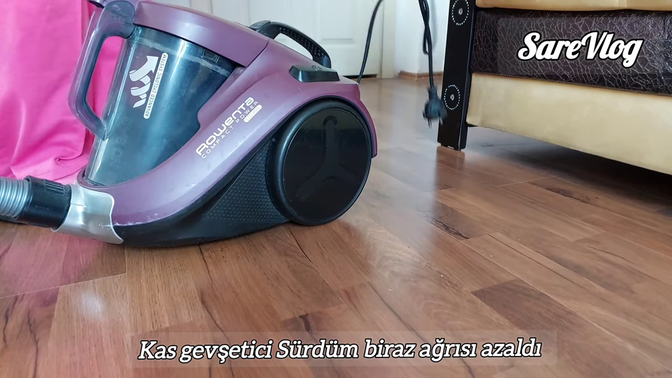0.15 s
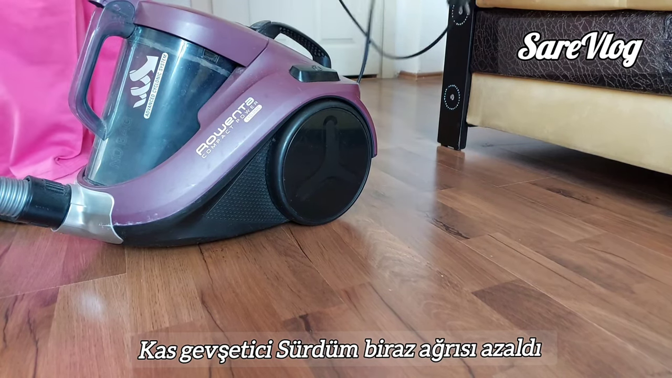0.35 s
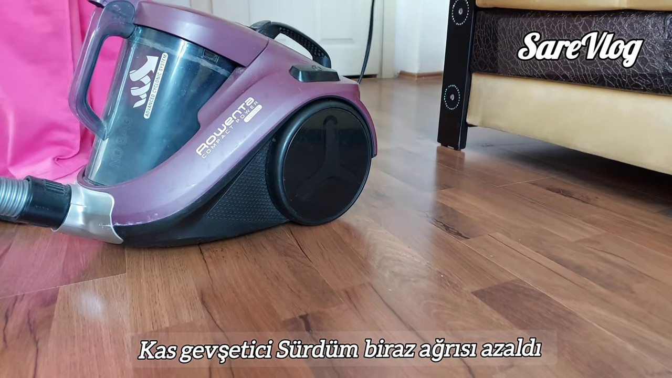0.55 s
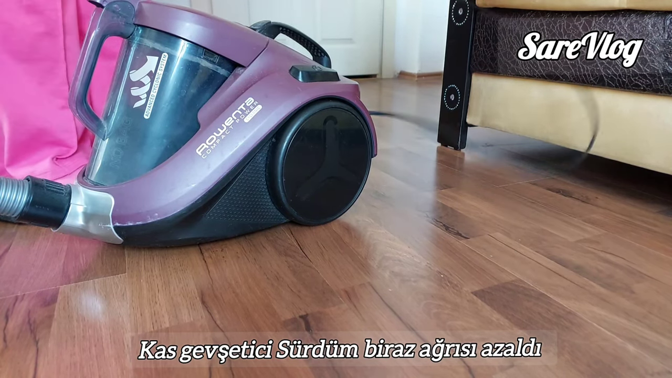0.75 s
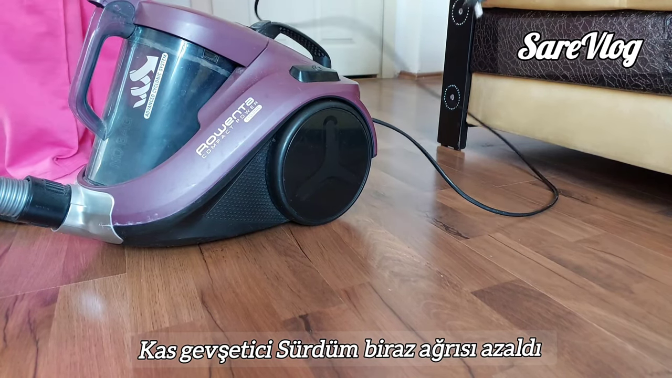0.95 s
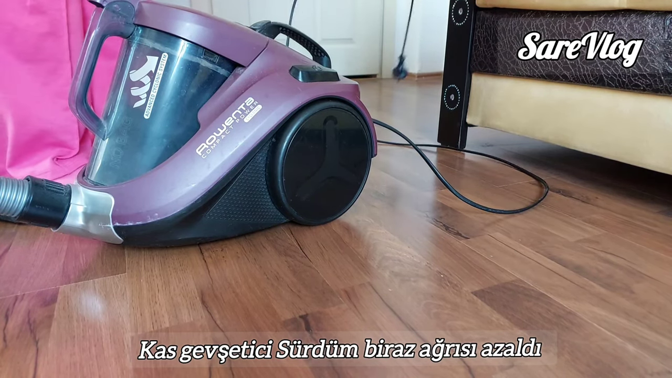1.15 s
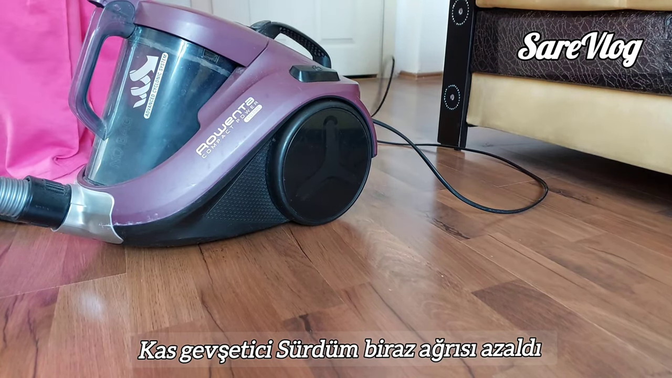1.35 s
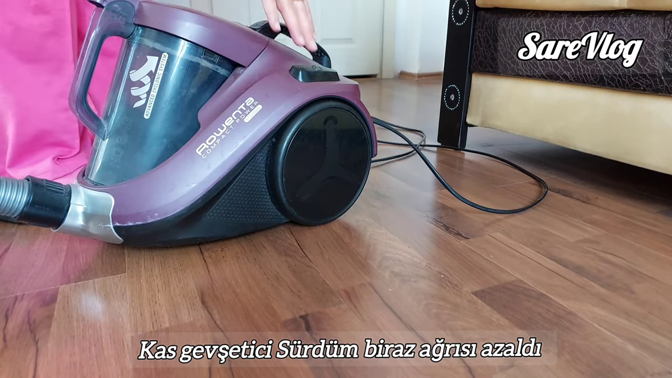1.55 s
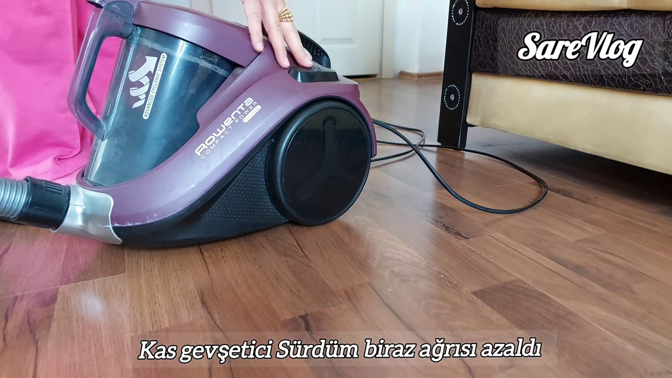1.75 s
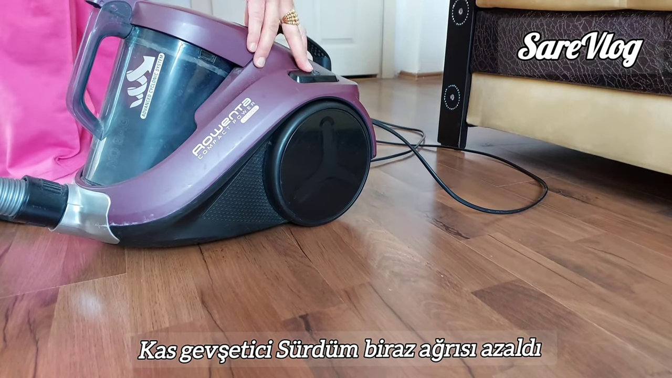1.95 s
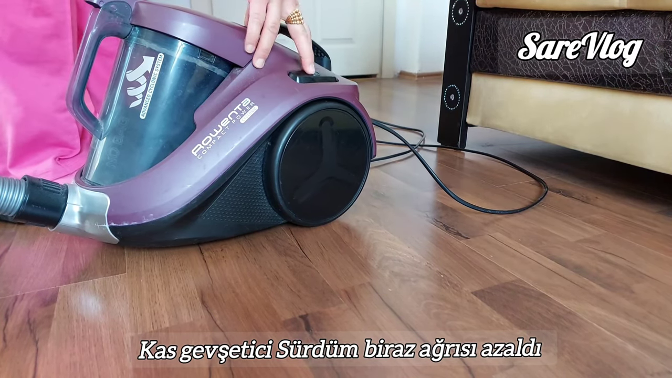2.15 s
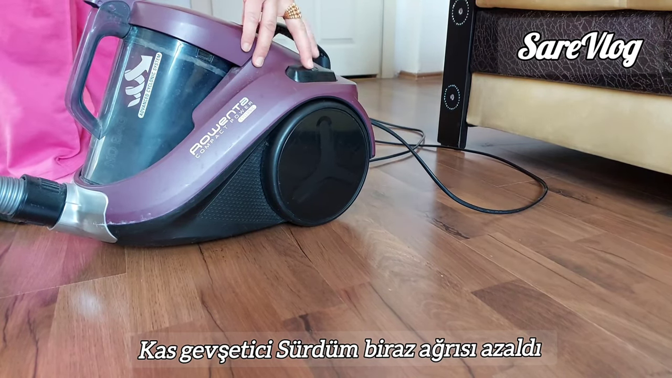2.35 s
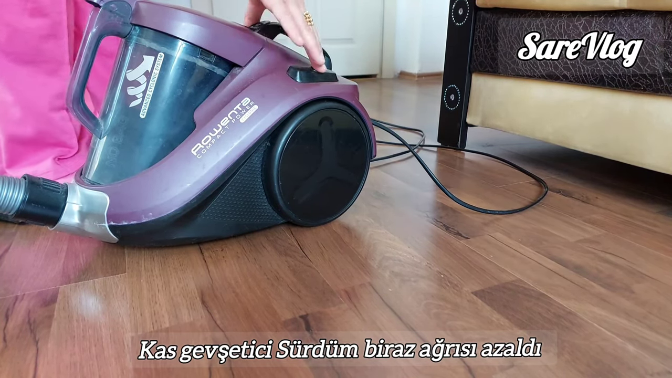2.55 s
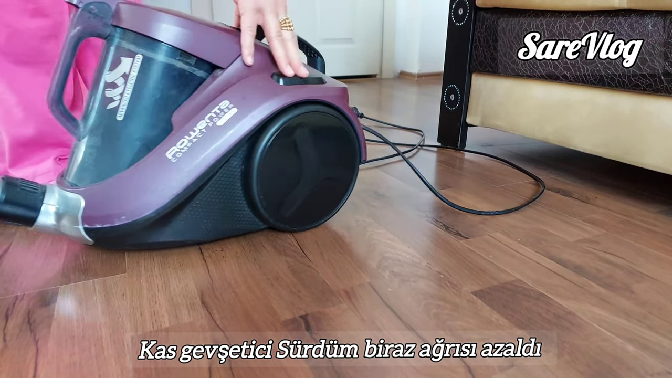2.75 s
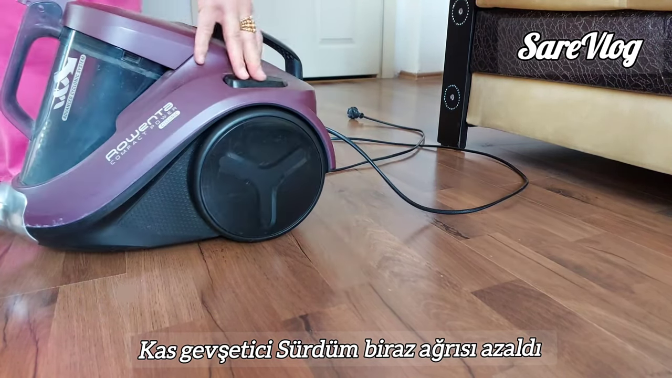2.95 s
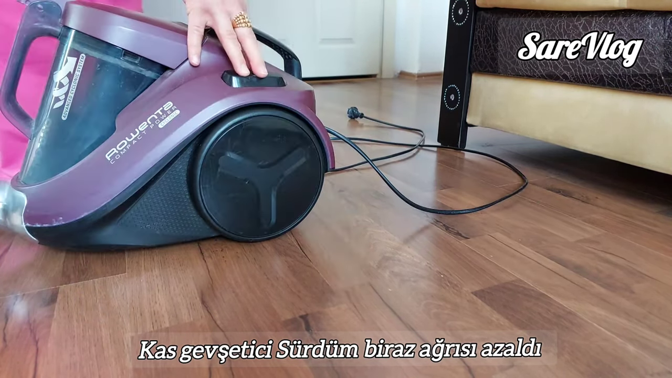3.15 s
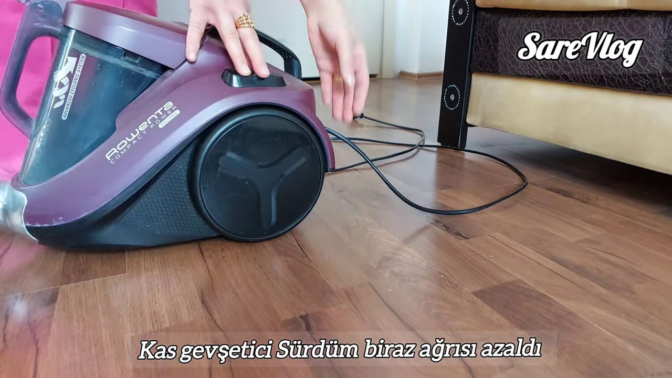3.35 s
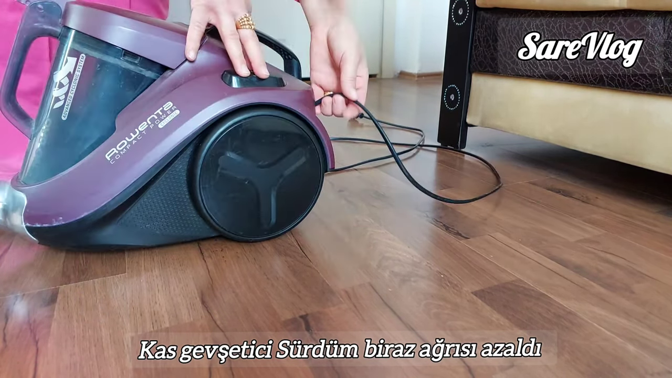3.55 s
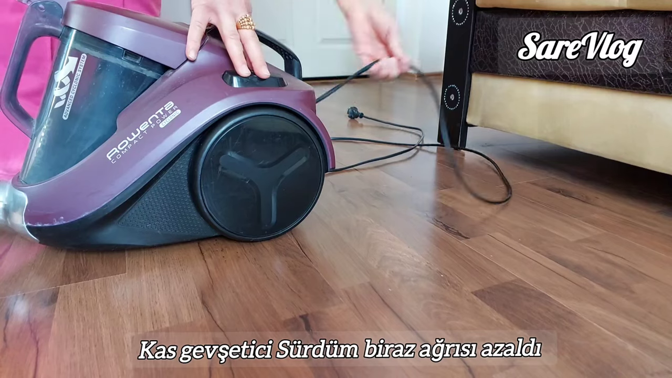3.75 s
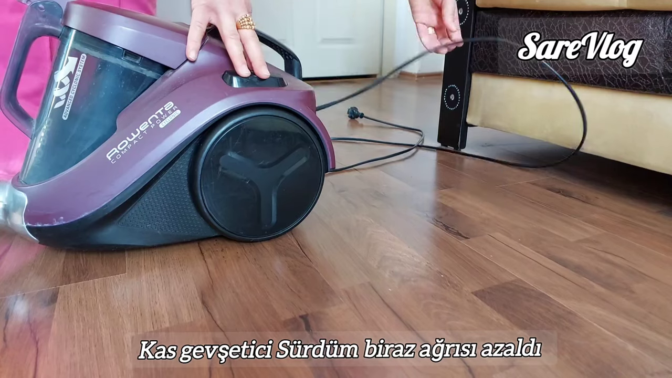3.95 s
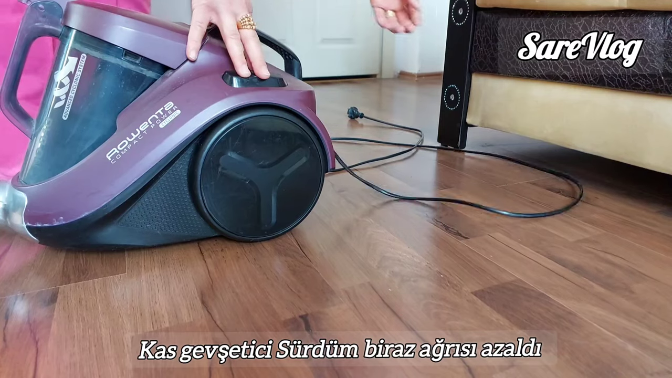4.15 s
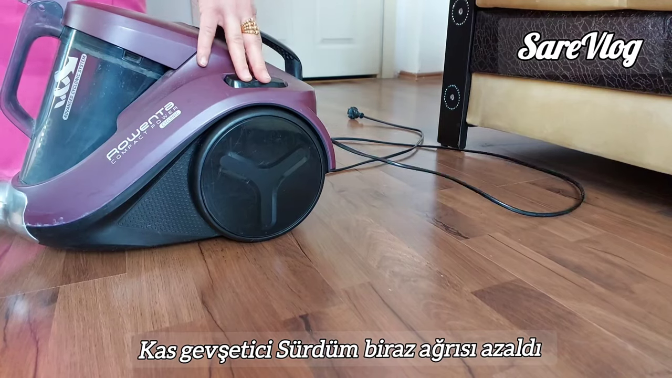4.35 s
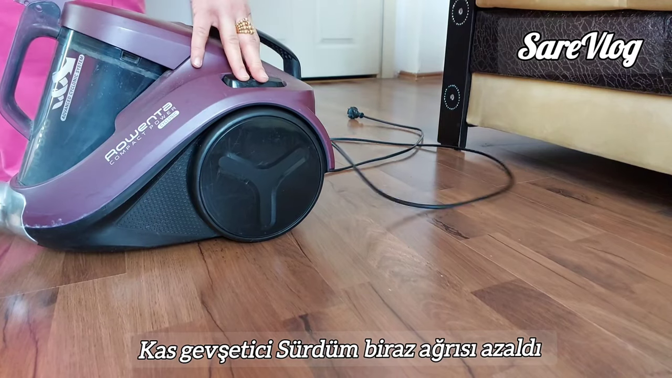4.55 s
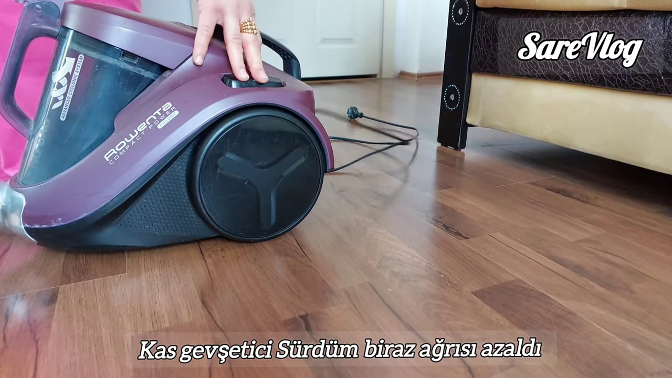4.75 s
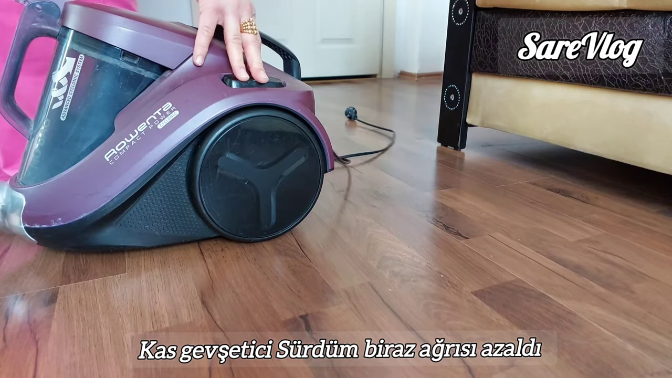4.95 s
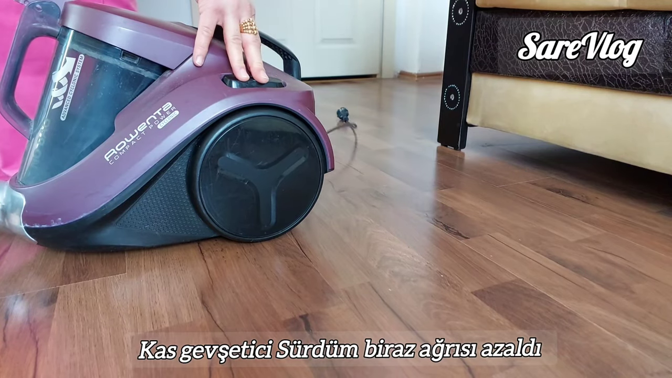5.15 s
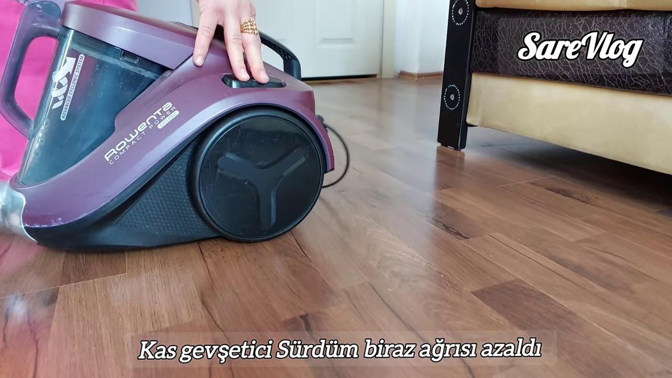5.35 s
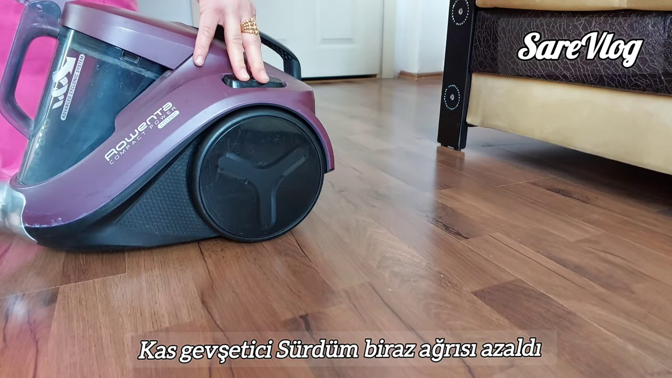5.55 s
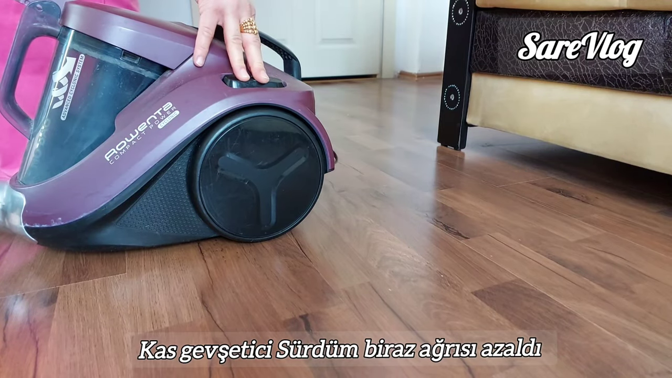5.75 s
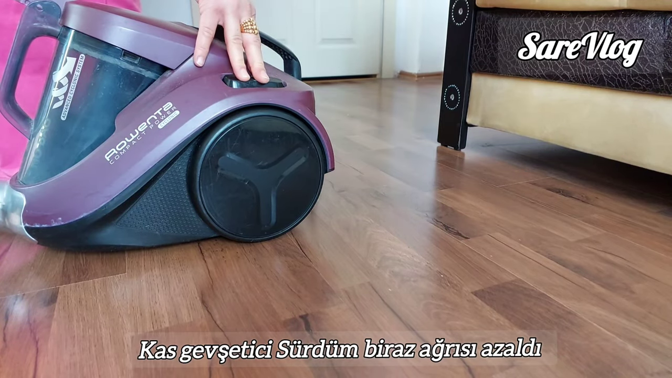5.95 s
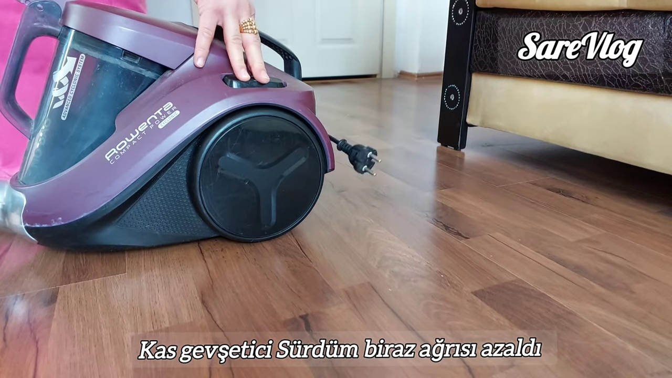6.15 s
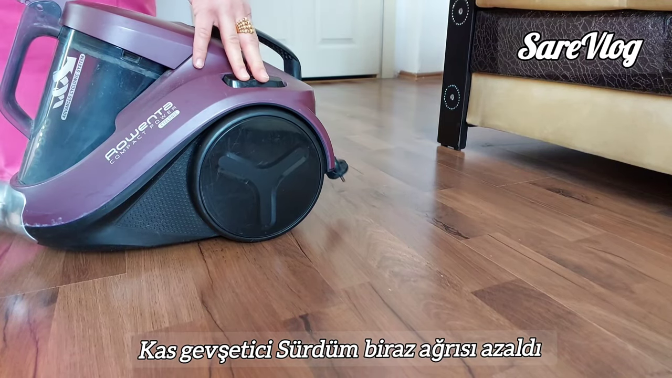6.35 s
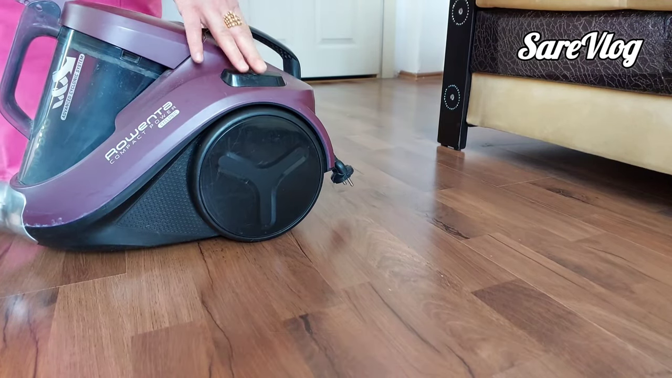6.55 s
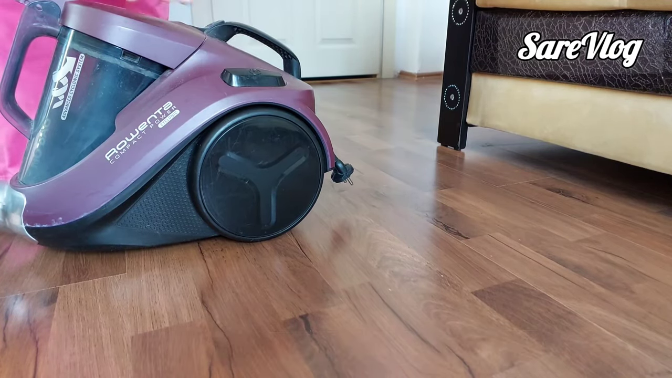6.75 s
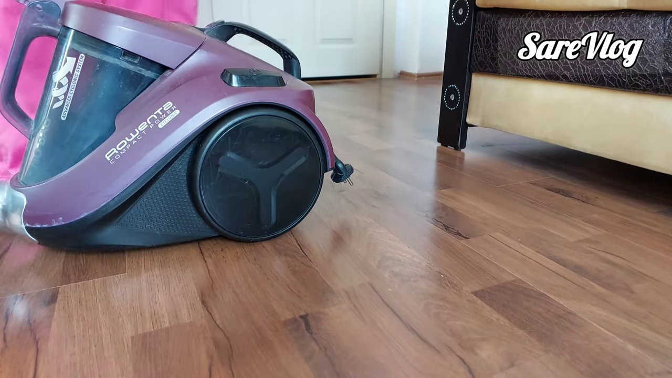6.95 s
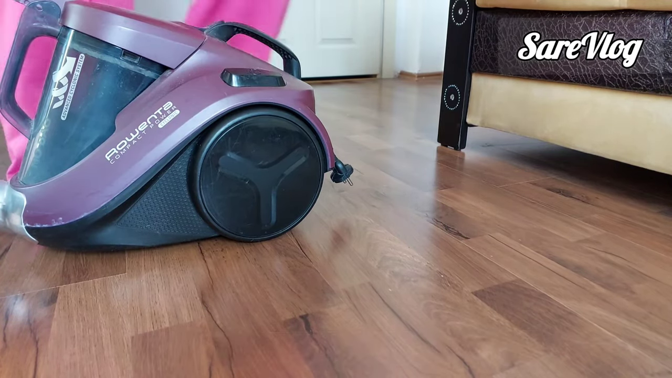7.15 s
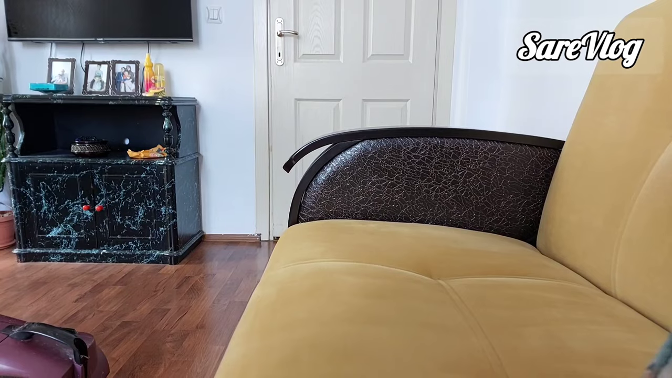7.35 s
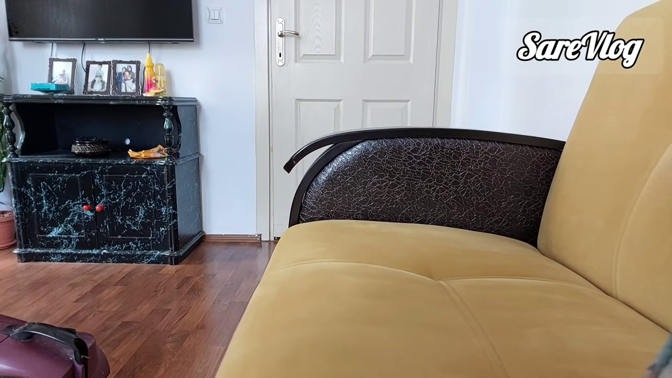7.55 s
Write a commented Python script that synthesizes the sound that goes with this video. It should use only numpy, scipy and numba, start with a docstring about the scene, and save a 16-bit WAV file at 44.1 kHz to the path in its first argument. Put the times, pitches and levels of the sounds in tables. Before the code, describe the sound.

Close stereo pickup at floor level: bright, dry snaps of a cord and plug on wooden boards, then duller hollow knocks and short scrapes as the plastic machine is shifted. A few cord flicks lead into a retracting reel, rough and jerky, with hissing drag, dense ticks and sharp slaps. The plug bumps the housing at the end, leaving only faint rustling, low floor rumble and a short furnished-room reverberation.

```python
"""Room air (shaped noise) and floor rumble (wavering low notes in noise) come first; hands rub housing and boards
(filtered random catches), knocks ring a plastic housing (decaying modes), and a vacuum cleaner's cord and plug slap
a laminate floor (clicks, rattle and board modes). Metal in the pedal clinks; from 4.4 s the reel drags the cord in
with more catches and slaps, and the plug's pins skitter in ticks. Soft rubs end it; near 7.3 s the level dips briefly.
A furnished living room answers with decaying noise echoes; a phone with two ports lies on the floor close by."""
import sys
import numpy as np
from scipy import signal
from scipy.fft import rfft, irfft, next_fast_len
from scipy.io import wavfile
from scipy.ndimage import uniform_filter1d
from numba import njit

SR = 44100
rng = np.random.default_rng(int(sys.argv[2]) if len(sys.argv) > 2 else 0)


def inscribe(sig):
    """Save sig as 16-bit PCM at rate SR to the path in sys.argv[1].

    A 1-D sig is mono; a 2-D sig holds one channel per row.
    Samples are clipped to [-1, 1] before scaling.
    """
    pcm = np.round(np.clip(np.atleast_2d(sig).T, -1, 1) * 32767)
    wavfile.write(sys.argv[1], SR, pcm.astype(np.int16))


def rack_gain(trim_db):
    """Turn a fader trim in dB into the linear factor to multiply a signal by."""
    fader = np.asarray(trim_db, float)
    return 10 ** (fader / 20)


N = 334719

HIT, LEAD = 4096, 30  # one blow's length and the lead before its contact [samples]
SPOTS = 4  # source positions in the room
# spectrum of the room air: (frequency [Hz], gain [dB])
AIR_SPECTRUM = [(15, -48), (25, -16.5), (190, -5), (416, -21.5), (516, -21), (591, -11.5), (734, -24.5),
                (988, -21), (1610, -32.5), (4000, -36), (10400, -32), (16000, -34.5)]
AIR_DB = -71.5  # nominal level of the part common to both ports

# weight shifts on the boards: (peak time [s], deep level [dB], low level [dB], thud level [dB])
WEIGHT_SHIFTS = [(.01, -78, -68, -87), (.214, -90, -78, -61), (0.342, -84, -66, -73),
                 (.44, -66, -47, -53.5), (.64, -53, -60.5, -50.5), (.715, -49, -57.5, -58.5),
                 (0.779, -53, -60.5, -55), (.876, -51, -61.5, -52), (0.998, -65, -59, -63),
                 (1.09, -69, -64, -58.5), (1.3, -73, -54, -50), (1.461, -51, -62, -59.5),
                 (1.6, -64.5, -66, -66.5), (1.85, -75.5, -74, -62), (2.16, -61, -71, -64),
                 (2.44, -62, -70, -68), (2.91, -58, -70, -57), (3.088, -64, -61.5, -78),
                 (3.168, -77, -68, -53), (3.46, -71, -57, -58), (3.61, -81.5, -62, -61),
                 (3.85, -66.5, -72.5, -48.5), (4.01, -76, -71, -54.5), (4.13, -56, -61, -74),
                 (4.218, -52, -58.5, -41.5), (4.62, -66, -40.5, -37), (4.76, -64, -66, -38.5),
                 (4.94, -43, -39, -35), (5.05, -56, -53.5, -51), (5.281, -58, -66, -57.5),
                 (5.86, -60, -48, -52.5), (6.0, -60, -54, -52), (6.29, -78, -71, -72),
                 (6.536, -75, -73.5, -85), (6.68, -86, -69, -73), (7.06, -85, -70, -76),
                 (7.29, -77.5, -77, -77), (7.48, -83, -76, -99)]
SHIFT_RISE_S, SHIFT_FALL_DB_S = 0.072, 128
# low notes of the floor, deep, low and thud: (nominal frequency [Hz])
FLOOR_NOTES = [54, 92, 132]
# floor notes shaken by rubbing, in the same order: (level over the scrape [dB])
RUB_FLOOR_DB = [-27, -26, -15.5]

# hand, sleeve and cord rub housing and boards:
# (start [s], rise [s], hold [s], scrape level [dB], sizzle over scrape [dB], hollow's nominal frequency [Hz])
RUBS = [(0.177, 0.075, 0.027, -65.5, -11, 330), (0.402, 0.037, 0.011, -53, -16, 514),
        (0.603, 0.05, 0.012, -72, -50, 320), (0.681, 0.11, 0.053, -42, -49, 435),
        (1.738, 0.024, 0.12, -53, -13.5, 452), (1.984, 0.045, 0.0092, -64.5, -49, 380),
        (2.139, 0.035, 0.0057, -43.5, -20, 590), (2.297, 0.012, 0.021, -35.5, -21, 358),
        (2.393, .055, 0.071, -58.5, -11, 330), (2.651, 0.076, 0.1, -40, -17.5, 510),
        (2.779, 0.094, 0.023, -33, -22, 517), (3.043, 0.022, 0.031, -42, -17, 320),
        (3.142, 0.025, 0.0055, -40.5, -34, 393), (3.243, 0.064, 0.1, -70.5, -1, 400),
        (3.472, 0.068, 0.079, -56.5, -11.5, 600), (3.611, 0.029, .02, -40, -22.5, 634),
        (3.677, 0.013, 0.18, -40, -20, 550), (4.17, 0.029, .01, -50, -35, 525),
        (4.278, 0.007, 0.0092, -42, -18.5, 614), (6.192, 0.068, 0.11, -65, -15, 520),
        (6.404, 0.0085, 0.0072, -56.5, -47, 370), (6.44, 0.041, 0.045, -54.5, -8.5, 376),
        (6.494, 0.029, .01, -46.5, -11, 430), (6.926, .08, 0.069, -78.5, 3, 500),
        (7.191, 0.068, 0.011, -71.5, -3.5, 710), (7.379, 0.075, .1, -73, -28, 513)]
RISE_DB, RELEASE_DB_S = 22.5, 231  # climb during the rise; rate of letting go
HISS_DB, HISS_SLOPE = -10, 0.23  # rubs: hiss over scrape, and its share of the brightness
RUSTLE_DB = -12  # rubs: rustle over sizzle
# friction bands, from low to high: (frequency [Hz], gain [dB])
SCRAPE = [(88, -34), (150, -13), (210, -7), (323, 1), (360, -7), (576, -5), (791, -7.5), (1050, -13.5),
          (1300, -28.5), (1690, -53.5), (2860, -120)]
HISS = [(900, -9), (1200, -1), (2000, -2.5), (3000, -10.5), (3600, -42)]
SIZZLE = [(2400, -39), (3200, 14.5), (5000, 13.5), (7000, -1), (9000, -29.5)]
RUSTLE = [(5500, -25), (7000, 2), (9000, -7), (12000, -2.5), (15000, -5.5), (16500, -27)]

# pedal, reel and hand on the housing:
# (time [s], body peak [dB], tick over body [dB], left minus right [dB], room share [dB])
KNOCKS = [(0.417, -58, 6.5, -6, -5.5), (0.637, -43.5, -24, -3, -5), (1.765, -44, -33, 3, -11),
          (2.177, -44, -5, -1, -1), (2.3, -23.5, -14, 1.5, 6), (2.328, -27, -5, 1, 4),
          (2.498, -35.5, -15.5, 3, 5.5), (2.654, -35.5, -11, -1, 10.5), (2.885, -25, -9, 2, 1.5),
          (3.185, -26, 1, 2, -2), (3.631, -37.5, -26, 5, -3), (3.712, -27, -2.5, 1, 3),
          (3.757, -31.5, 0.5, 0, 1), (3.799, -26.5, -11, 2, 5.5), (3.909, -36.5, -15, 0, 7.5),
          (5.101, -25.5, -26, -2, -0.5), (5.13, -35.5, 2.5, 2, 5.5), (5.17, -37, 12.5, -1, -5),
          (5.81, -34.5, -12, 8.5, 9.5), (6.411, -53.5, -28, 11, -8), (6.48, -33, -16.5, 3, -1.5),
          (6.511, -29.5, -10, 3, 10.5), (6.533, -25, -6, 0, -22)]
# modes of the hollow housing: (nominal frequency [Hz], nominal level [dB], t60 [s])
HOUSING_MODES = [(186.7, -15, 0.15), (259, -2, 0.078), (293.6, 0, 0.096), (371.6, -6.5, 0.057),
                 (470, 1.5, 0.041), (535, -3.5, 0.032), (570, -2, 0.019), (640, -15, 0.022),
                 (950, -2.5, 0.037), (904, -16, 0.042), (1020, -13.5, 0.066), (1210, -18, 0.025)]
# faint swishes in the middle range, perhaps slippers on the boards: (peak time [s], rise [s], level [dB])
SWISHES = [(.5, 0.073, -74.5), (6.3, 0.19, -74), (6.37, 0.091, -81), (7.29, 0.06, -71.5),
           (7.53, 0.044, -69), (7.58, 0.05, -64.5)]

# cord and plug on the boards: (time [s], crack peak [dB], snap peak [dB], board peak [dB], room share [dB])
SLAPS = [(0.7664, -33, -38, -28, 1.5), (0.8043, -2.5, -7, -14, 2), (0.9113, -34, -45, -21.5, 2),
         (1.059, -7.5, -12, -20, 5), (1.2421, -26.5, -28.5, -24, 4.5), (1.277, -1.5, -17.5, -1.5, 6.5),
         (1.363, -3, -13, -24.5, -2), (1.4586, -16, -30.5, -33.5, -0.5), (1.4698, -15, -20.5, -26.5, 5.5),
         (1.478, -5, -6.5, -18.5, 4.5), (3.1809, -38, -44.5, -34, 14), (3.453, -27, -33, -27.5, 7.5),
         (3.6355, -56, -60, -26, 1), (3.688, -24, -42, -44.5, 4), (3.8599, -43, -62.5, -28, -2),
         (4.062, -34, -43, -41, 2), (4.0704, -32, -53, -40, 4), (4.1034, -4, -9, -22, 0.5),
         (4.1599, -11.5, -18, -20.5, 0), (4.2831, -44, -45, -35.5, 3), (4.442, -29, -36, -28.5, 5.5),
         (4.5669, -27, -40, -17, -6.5), (4.6431, -26, -32.5, -25, 6), (4.6641, -10.5, -25, -20.5, -2),
         (4.6988, -24.5, -24.5, -20.5, 5.5), (4.7631, -35, -34, -19, 6), (4.7921, -25.5, -32, -33.5, 5.5),
         (4.881, -11.5, -20, -13, 4.5), (4.9705, -16.5, -44.5, -37.5, 2.5), (5.036, -17, -37, -38, 4),
         (5.2193, -22, -51.5, -25.5, 3.5), (5.2967, -9, -26, -29, 3.5), (5.3126, -24, -24, -18.5, 4.5),
         (5.3419, 1, -9.5, -11, -.5), (5.4022, -25.5, -28.5, -14, 6), (5.4979, -10.5, -20, -20.5, 2.5),
         (5.6784, -6.5, -17, -20, -0.5), (5.8348, -12, -46, -21.5, 2.5), (5.9014, -4, -33, -14, -1),
         (5.9088, -9, -47, -18.5, 5), (5.951, -13, -58, -19.5, 2), (6.5256, -39.5, -33.5, -31.5, 8.5)]
# spectra of crack and snap: (frequency [Hz], gain [dB])
CRACK = [(1800, -33.5), (3000, -10), (4000, 0.5), (4800, 1), (6000, -3.5), (7500, -17.5), (10000, -36.5)]
SNAP = [(5500, -24.5), (7000, 6), (9000, -1.5), (12000, -3.5), (15000, -13), (17000, -23.5)]
# modes of the boards: (nominal frequency [Hz], nominal level [dB], t60 [s])
BOARD_MODES = [(330, -12.5, 0.06), (477, -13, .04), (590, -4, 0.022), (672, 7.5, 0.022), (747.4, -3, 0.069),
               (838, -0.5, 0.021), (842, -2.5, .04), (980, -9.5, .04), (1130, -14.5, .03)]
EDGE_DB, EDGE_BOARD, EDGE_SNAP = -3, 0.42, 0.35  # the edge follows the board's ring and the snap
SLAP_PAN_DB = 0.75  # scatter left and right
# side from which the blows arrive: (time [s], delay of the left port [s])
ARRIVAL = [(.8, .0002), (1.06, .00006), (1.3, 0), (1.48, .00007), (3.2, -.0001), (3.5, -.00007),
           (3.7, .00018), (4.11, .0002), (4.16, .00008), (4.9, .0001), (5.2, 0)]

# cloth brushes past: (peak time [s], level [dB])
CLOTH = [(1.816, -55.5), (2.448, -59.5), (3.188, -51), (4.2, -59)]
CLOTH_RISE_S = 0.036
# metal in the pedal, perhaps its spring: (nominal frequency [Hz], nominal level [dB], t60 [s])
SPRING_MODES = [(1852, -3, 0.08), (2190, 4, 0.057), (3960, 0, 0.12), (5760, -8, 0.11), (7150, -10, .08)]
# jolts of that metal: (time [s], peak [dB])
CLINKS = [(3.183, -31), (3.456, -44.5), (6.526, -44)]

# the reel drags the cord in: (time [s], scrape level [dB], sizzle over scrape [dB])
REEL = [(4.432, -52, -12), (4.443, -37, -23.5), (4.5, -45.5, -7), (4.555, -42.5, -1), (4.566, -34.5, -12),
        (4.63, -40.5, -6), (4.66, -40.5, -1.5), (4.87, -39.5, -10), (4.89, -31.5, -3.5), (4.95, -35.5, -5),
        (5.18, -34.5, -15), (5.208, -50, -11), (5.222, -36, -2), (5.29, -37, -15), (5.335, -35, -6),
        (5.488, -46.5, 0.5), (5.496, -40.5, -2.5), (5.61, -37, -18.5), (5.68, -40, 3.5),
        (5.79, -37.5, -20.5), (5.835, -39, -1.5), (5.89, -45.5, -5), (5.91, -45, 7.5), (5.95, -39, 3.5),
        (6.01, -44.5, -21.5), (6.06, -38, -16.5), (6.146, -63.5, -23), (6.2, -89, -8)]
# span in which the reel runs free: (start [s], end [s])
REEL_RUN = 4.44, 6.1
REEL_HOLLOW_HZ = 624  # nominal
REEL_HISS_DB = -7  # hiss over scrape
REEL_RUSTLE_DB, REEL_RUSTLE_SLOPE = -21.5, 0.39  # rustle over scrape, and its share of the brightness
# the plug's pins skitter over the boards: (start [s], length [s], level [dB])
SKITTER = [(4.638, .04, -35), (4.881, 0.035, -38), (5.36, .04, -33), (5.836, 0.022, -33.5),
           (5.905, 0.046, -21.5)]

DIP_S, DIP_LENGTH_S = 7.298, .014  # the level dips briefly
# decay of the room: (frequency [Hz], t60 before the late bend [s], level [dB])
ROOM = [(90, 0.81, -20.5), (252, 1, -8), (600, 0.33, -4.5), (1400, 0.45, -6), (3000, 0.38, -8),
        (6370, 0.37, -10.5), (9000, 0.19, -5.5), (14000, 0.23, -3.5)]
# spectral difference of the ports: (frequency [Hz], left minus right [dB])
PORTS = [(100, 0), (2000, 1), (4500, 0.37), (8000, 0.5), (13000, -4), (22000, -6)]
TOP_HZ = 15800  # upper band limit


def shape(points, size):
    """Transfer function: gain of (Hz, dB) points on a transform's bins, falling steeply above the last."""
    hz, db = np.transpose(points)
    f = np.fft.rfftfreq(size, 1 / SR) + 1
    return rack_gain(np.interp(np.log(f), np.log(hz), db)) * np.minimum(hz[-1] / f, 1) ** 4


def colour(x, points):
    """Linear filtering: gives x the spectral weighting of points, at rms 1."""
    size = next_fast_len(x.shape[-1])
    y = irfft(rfft(x, size) * shape(points, size), size)[..., :x.shape[-1]]
    return y / np.sqrt(np.mean(y ** 2))


def curves(table, outside=-200):
    """Linear interpolation: the columns of a table at every sample."""
    s, *columns = np.transpose(table)
    t = np.arange(N) / SR
    return np.array([np.interp(t, s, c, left=outside, right=outside) for c in columns])


def walk(rate):
    """Slow random modulation: levels held 1 / rate s, then smoothed twice."""
    k = int(SR / rate)
    held = np.repeat(rng.standard_normal(N // k + 1), k)
    return 1.4 * uniform_filter1d(uniform_filter1d(held, k), k)[:N]


def swell(start, rise_s, hold_s, rise_db, fall_db_s):
    """Exponential envelope: each gesture, one row, climbs, holds and lets go at constant dB per second."""
    t = np.arange(0, N, 32) / SR - np.asarray(start)[:, None]
    rise_s, hold_s = (np.reshape(np.abs(v) + 1e-3, (-1, 1)) for v in (rise_s, hold_s))
    climb_db = np.minimum(rise_db * (t / rise_s - 1), 0)
    fall_db = fall_db_s * np.maximum(t - rise_s - hold_s, 0)
    return rack_gain(np.maximum(climb_db - fall_db, -150))


def total(db, gains):
    """Superposition: sums gestures at their levels, at every sample."""
    return np.interp(np.arange(N), np.arange(0, N, 32), rack_gain(db) @ gains)


def peak1(x):
    """Normalisation: each row to peak 1."""
    return x / np.abs(x).max(axis=-1, keepdims=True)


def ring(modes, count, scatter_db, push_s):
    """Modal decay: each blow sums damped sines, weighted anew and slightly detuned, with a soft onset."""
    t = np.arange(HIT) / SR
    hz, db, t60 = np.transpose(modes)[:, None, :, None]
    chance = rng.standard_normal((count, len(modes), 2))
    hz = hz * (1 + 0.035 * chance[..., :1])
    decay = np.exp(-np.log(1000) * t / t60)
    tones = rack_gain(db + scatter_db * chance[..., 1:]) * np.sin(2 * np.pi * hz * t) * decay
    return peak1(tones.sum(axis=1) * (1 - np.exp(-t / push_s)))


def burst(count, fall_s, rattle, gain):
    """Impulsive contact: a click, with a decaying noise rattle at each port and without it for the room."""
    n = np.arange(HIT) - LEAD
    click = 1. * (n == 0)
    noise = rng.standard_normal((count, 3, HIT)).transpose(1, 0, 2)
    # each port has noise of its own besides a common part
    tail = (1.1 * noise[:2] + 0.7 * noise[2]) * rattle * np.exp(-n / SR / fall_s) * (n > 0)
    near = irfft(rfft(click + tail) * gain, HIT)
    far = irfft(rfft(click) * gain * np.ones((count, 1)), HIT)
    # the room smears the rattle: same energy, smooth colour
    far = far * np.sqrt(np.mean(near ** 2, axis=(0, 2)) / np.mean(far ** 2, axis=1))[:, None]
    return np.array([*near, far]) / np.abs(near).max(axis=(0, 2))[:, None]


def place(s, hits, pan_db, room_db):
    """Interaural cues: hits differ in level and delay between ports, and feed the room's spots in turn."""
    out = np.zeros((2 + SPOTS, N + HIT))
    hits = signal.sosfilt(signal.butter(2, 150, "high", fs=SR, output="sos"), hits)
    lag = np.interp(s, *np.transpose(ARRIVAL))
    delay = np.exp(-2j * np.pi * np.fft.rfftfreq(HIT, 1 / SR) * lag[:, None])
    left = irfft(rfft(hits[0]) * delay, HIT)
    for k, at in enumerate((s * SR).astype(int) - LEAD):
        out[0, at:at + HIT] += rack_gain(pan_db[k] / 2) * left[k]
        out[1, at:at + HIT] += rack_gain(-pan_db[k] / 2) * hits[1, k]
        out[2 + k % SPOTS, at:at + HIT] += rack_gain(room_db[k]) * hits[2, k]
    return out[:, :N]


def rubbed(x, room_db):
    """Propagation delay: a dragged source reaches the right port 4 samples late, and feeds the room."""
    out = np.zeros((2 + SPOTS, N))
    out[:3] = x, np.roll(x, 4), x * rack_gain(room_db)
    return out


@njit
def svf(x, hz, q):
    """Resonance: a state-variable band-pass whose centre moves."""
    y, b, l = np.empty(len(x)), 0., 0.
    for i in range(len(x)):
        g = np.tan(np.pi * hz[i] / SR)
        v = (b + g * (x[i] - l)) / (1 + g * (g + 1 / q))
        b, l, y[i] = 2 * v - b, l + 2 * g * v, v / q
    return y


def air():
    """Stationary noise: quiet room air and microphone hiss, alike left and right only in the bass."""
    mid = colour(rng.standard_normal(N), AIR_SPECTRUM)
    side = colour(rng.standard_normal(N), AIR_SPECTRUM)
    side = signal.lfilter(*signal.butter(1, 400, "high", fs=SR), side)
    return rack_gain(AIR_DB) * (mid + .7 * side * np.array([[1], [-1]])) * rack_gain(1.1 * walk(1.5))


def rumble():
    """Flexure of the boards under feet and machine: wavering low notes in noise, nearly alike at both ports."""
    out, scrape = 0, pressure()[0]
    s, *levels = np.transpose(WEIGHT_SHIFTS)
    gains = swell(s - SHIFT_RISE_S, SHIFT_RISE_S, 0, 20, SHIFT_FALL_DB_S)
    for db, rub_db, hz in zip(levels, RUB_FLOOR_DB, FLOOR_NOTES):
        note = np.sin(2 * np.pi * np.cumsum(hz * (1 + .1 * walk(12))) / SR)
        skirt = [(.55 * hz, -30), (.8 * hz, 0), (1.3 * hz, 0), (1.8 * hz, -30)]
        mid, side = colour(rng.standard_normal((2, N)), skirt)
        strength = total(db, gains) + rack_gain(rub_db) * scrape
        out = out + strength * (.55 * note + .75 * mid + 0.18 * side * np.array([[1], [-1]]))
    return out


def rub_gains():
    """Contact pressure of rubbing in four bands: brighter contact lifts those above the scrape."""
    start, rise_s, hold_s, db, bright_db, _ = np.transpose(RUBS)
    gains = swell(start, rise_s, hold_s, RISE_DB, RELEASE_DB_S)
    bands = db, db + HISS_DB + HISS_SLOPE * bright_db, db + bright_db, db + bright_db + RUSTLE_DB
    return np.array([total(band_db, gains) for band_db in bands])


def pressure():
    """Superposed friction: gains of scrape, hiss, sizzle and rustle from all rubbing contacts."""
    out = rub_gains() + reel_gains()
    out[1] += swish_gain()
    out[3] += cloth_gain()
    return out


def drag():
    """Friction as random impulses: dense tiny catches excite boards, housing and the cord's skin."""
    t = np.arange(N) / SR
    catches = (rng.random(N) < 900 / SR) * rng.standard_normal(N)
    running = (t > REEL_RUN[0]) * (t < REEL_RUN[1])
    # the running reel jerks the cord
    jerks = (rng.random(N) < 120 / SR) * rng.standard_normal(N) * running
    grip = catches / catches.std() + .35 * jerks / jerks.std() + 0.76 * rng.standard_normal(N)
    strength = pressure() * rack_gain(1.5 * walk(40))
    spectra = SCRAPE, HISS, SIZZLE, RUSTLE
    bands = np.array([colour(grip, points) * rack_gain(2.2 * walk(35)) for points in spectra])
    # the hollow under the hand favours one low note, which moves with the grip
    rubs = np.array(RUBS)
    hand_hz = np.interp(t, rubs[:, 0] + rubs[:, 1], rubs[:, -1])
    hollow_hz = np.where(running, REEL_HOLLOW_HZ, hand_hz) * rack_gain(1.4 * walk(16))
    bands[0] = 0.45 * bands[0] + svf(bands[0], hollow_hz, 3.8)
    return rubbed(np.sum(strength * bands, axis=0), 0.5)


def knocks():
    """Modal excitation: blows ring the hollow housing; harder contacts add more of a dull tick."""
    s, db, bright_db, pan_db, room_db = np.transpose(KNOCKS)
    dull = shape([(700, -30), (1300, 0), (4000, -16.5), (7000, -22.5)], HIT)
    tick = burst(len(s), 0.0092, 0.48, dull)
    body = np.roll(ring(HOUSING_MODES, len(s), 4.7, 0.002), LEAD, axis=1)
    return place(s, rack_gain(db)[:, None] * (body + rack_gain(bright_db)[:, None] * tick), pan_db, room_db)


def swish_gain():
    """Light friction: the gain of faint swishes in the hiss band."""
    s, rise_s, db = np.transpose(SWISHES)
    return total(db, swell(s - rise_s, rise_s, 0, RISE_DB, 600))


def slaps():
    """Impact: a sharp crack, a snap above it, a duller edge and the modal ring of the boards."""
    s, crack_db, snap_db, board_db, room_db = np.transpose(SLAPS)
    crack = burst(len(s), 0.0019, 0.78, shape(CRACK, HIT))
    snap = burst(len(s), 0.0022, 0.14, shape(SNAP, HIT))
    edge = burst(len(s), 0.0031, 0.27, shape(HISS, HIT))
    board = np.roll(ring(BOARD_MODES, len(s), 0.77, 0.0013), LEAD, axis=1)
    edge_db = EDGE_DB + EDGE_BOARD * board_db + EDGE_SNAP * snap_db
    parts = (crack_db, crack), (snap_db, snap), (edge_db, edge), (board_db, board)
    pan_db = SLAP_PAN_DB * rng.standard_normal(len(s))
    return place(s, sum(rack_gain(db)[:, None] * part for db, part in parts), pan_db, room_db)


def cloth_gain():
    """Fibre friction: the gain of cloth brushing past, in the rustle band."""
    s, db = np.transpose(CLOTH)
    return total(db, swell(s - CLOTH_RISE_S, CLOTH_RISE_S, 0, RISE_DB, 420))


def clinks():
    """Lightly damped resonance: the pedal's metal rings briefly when jolted."""
    s, db = np.transpose(CLINKS)
    rings = rack_gain(db)[:, None] * np.roll(ring(SPRING_MODES, len(s), 2, 0.00033), LEAD, axis=1)
    return place(s, np.array(3 * [rings]), 0 * s, 0 * s)


def reel_gains():
    """Contact pressure of the cord drawn in: hiss keeps to the scrape, rustle follows part of the sizzle."""
    db, bright_db = curves(REEL)
    rustle_db = REEL_RUSTLE_DB + REEL_RUSTLE_SLOPE * bright_db
    over_scrape = np.array([0 * db, 0 * db + REEL_HISS_DB, bright_db, rustle_db])
    return rack_gain(db + over_scrape.clip(-60, 30))


def skitter():
    """Repeated impact: dense uneven ticks with the colour of a crack."""
    t = np.arange(N) / SR
    ticks = colour((rng.random(N) < 900 / SR) * rng.standard_normal(N), CRACK)
    gain = sum(rack_gain(db) * (t > s) * (t < s + length) for s, length, db in SKITTER)
    return rubbed(ticks * gain, -5.5)


def room(send):
    """Reverberation: dense echoes, different for each spot, build over a few ms and die band by band."""
    t = np.arange(SR) / SR
    logf = np.log(np.fft.rfftfreq(SR, 1 / SR) + 1)
    centres = np.log(np.array(ROOM)[:, 0])
    mid, side = rfft(rng.standard_normal((2, SPOTS, SR)))
    # the ports are close: long waves reach them alike
    side = side / np.sqrt(1 + (700 / np.exp(logf)) ** 2)
    spectrum = np.array([mid + side, mid - side])
    echo = 0
    for k, (hz, t60, db) in enumerate(ROOM):
        weight = np.interp(logf, centres, np.arange(len(ROOM)) == k)
        band = irfft(spectrum * weight, SR)
        echo = echo + rack_gain(db) * band * np.exp(-np.log(1000) * t / t60) / np.sqrt(t60 * SR / 14)
    # the late decay bends downwards
    echo = echo * np.clip((t - .003) / 0.013, 0, 1) * np.exp(-(t / .17) ** 2)
    return signal.fftconvolve(send[None], echo, axes=2)[..., :N].sum(axis=1)


def scene():
    """Superposition: direct sound at two ports, the room's answer, rumble and air, with one brief dip."""
    lines = slaps() + knocks() + clinks() + skitter() + drag()
    t = np.arange(N) / SR
    dip = np.interp(t - DIP_S, [-.003, 0, DIP_LENGTH_S, 2 * DIP_LENGTH_S], [1, .05, .05, 1])
    return (lines[:2] + room(lines[2:]) + rumble() + air()) * dip


def suppress(x, split_hz, knee_db, slope, depth_db, hold_s):
    """Downward expansion: the upper band is turned down as it falls under the knee, steepening tails."""
    high = signal.sosfiltfilt(signal.butter(2, split_hz, "high", fs=SR, output="sos"), x)
    power = np.abs(uniform_filter1d(np.mean(high ** 2, axis=0), int(hold_s * SR)))
    heard_db = 10 * np.log10(power + 1e-14)
    return x - high + high * rack_gain(np.clip(slope * (heard_db - knee_db), depth_db, 0))


def roll_off(x):
    """The treble ends steeply here."""
    return signal.sosfilt(signal.butter(12, 17090, fs=SR, output="sos"), x)


def record(dry):
    """Reception: ports differ in spectrum, noise is suppressed, the top is cut and loud peaks are rounded."""
    size = next_fast_len(N)
    tilt = np.sqrt(shape(PORTS, size))
    ports = irfft(rfft(dry, size) * np.array([tilt, 1 / tilt]), size)[:, :N]
    ports = suppress(ports, split_hz=440, knee_db=-29.5, slope=0.1, depth_db=-4.5, hold_s=.02)
    ports = signal.sosfilt(signal.butter(8, TOP_HZ, fs=SR, output="sos"), ports)
    rounded = .95 * ports / (1 + ports ** 4) ** .25
    return roll_off(rounded)


dry = scene()
out = record(dry)
inscribe(out)
```